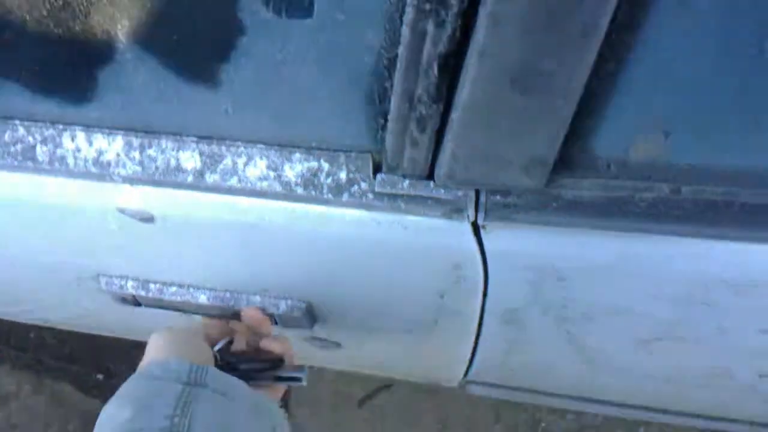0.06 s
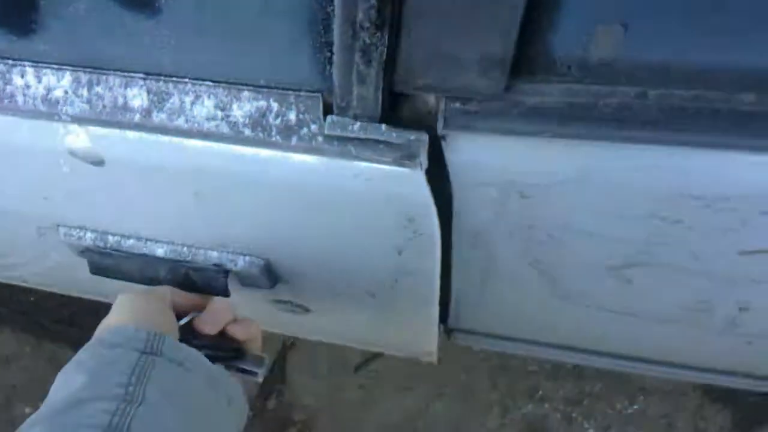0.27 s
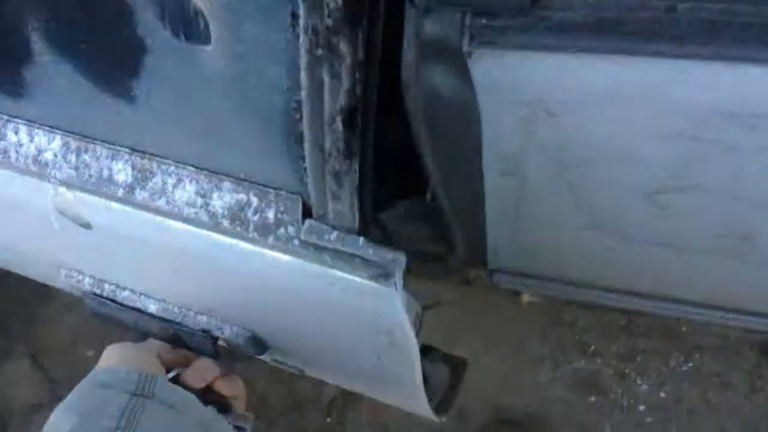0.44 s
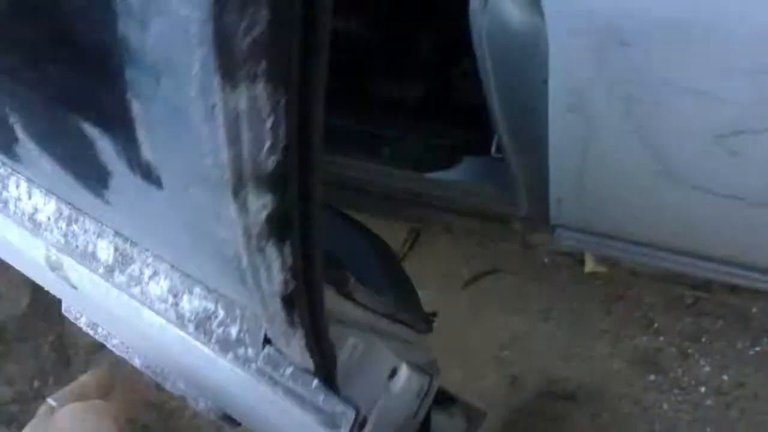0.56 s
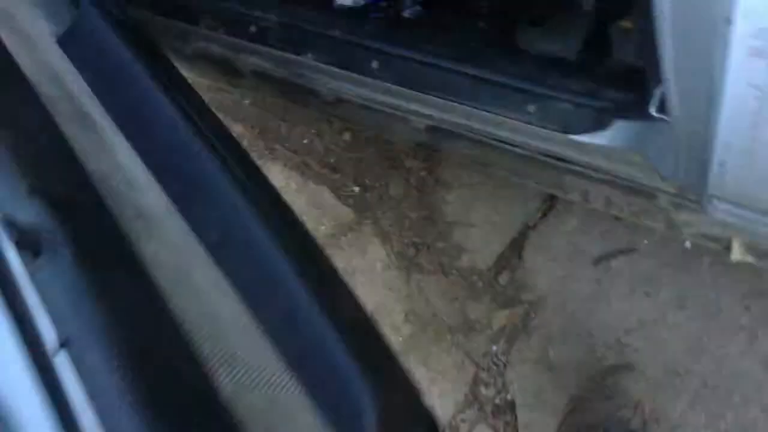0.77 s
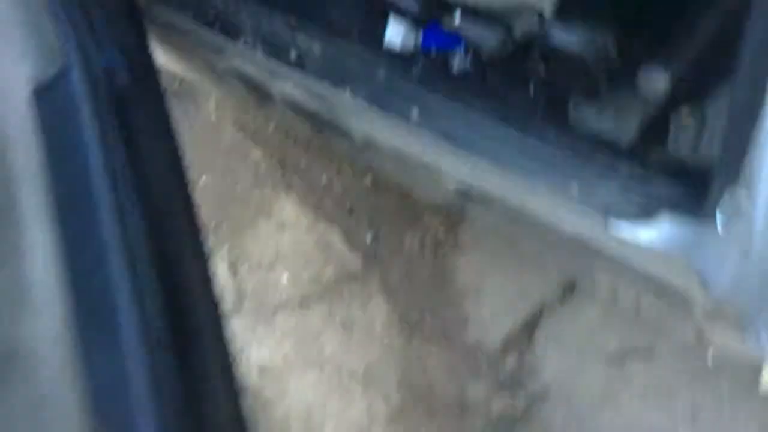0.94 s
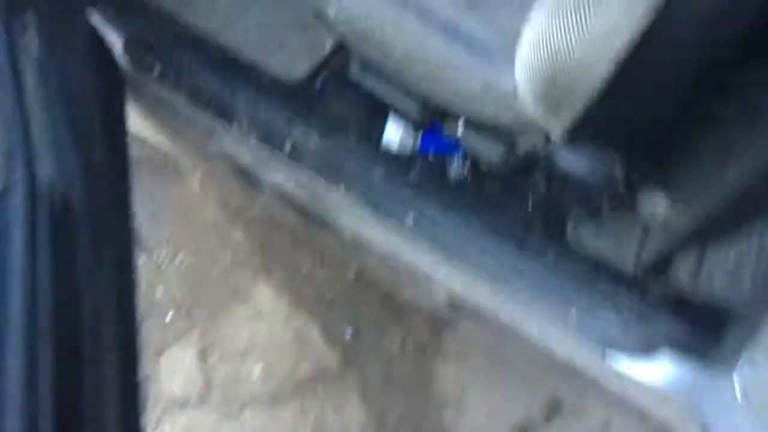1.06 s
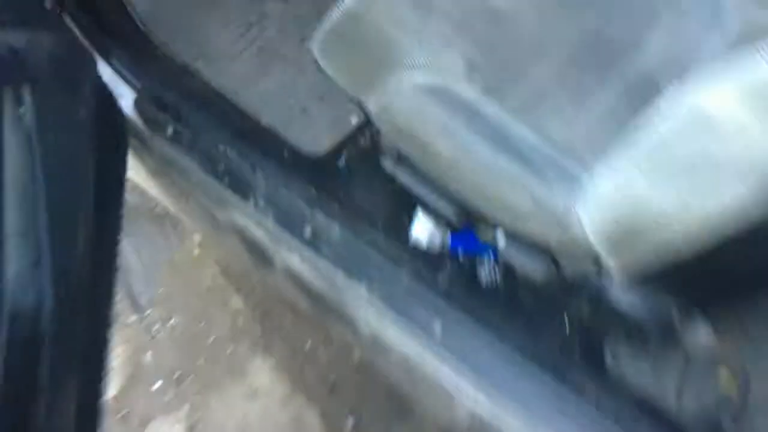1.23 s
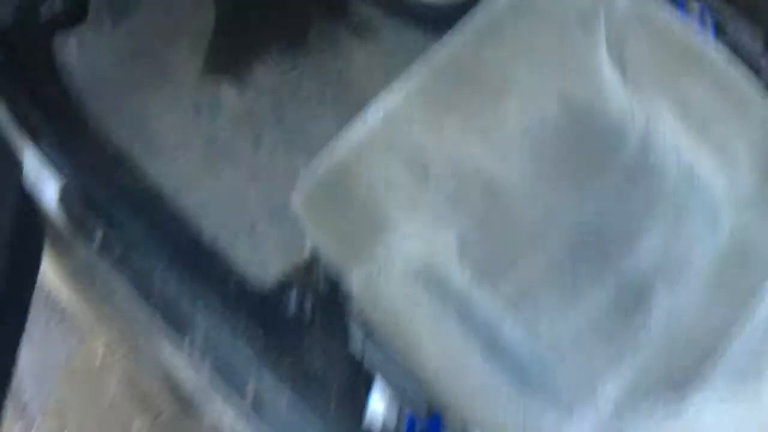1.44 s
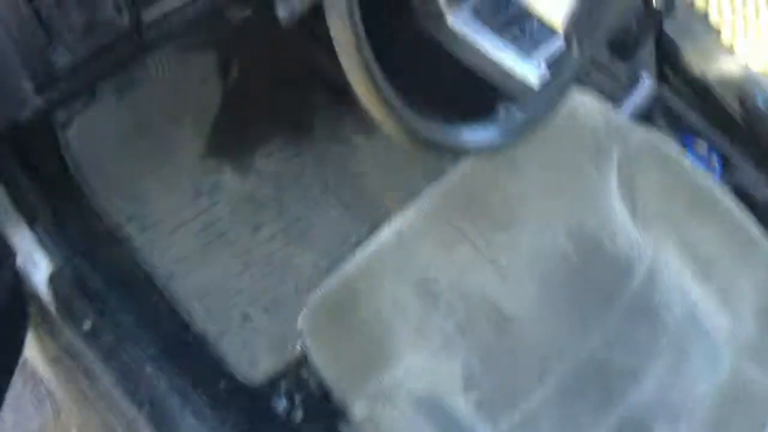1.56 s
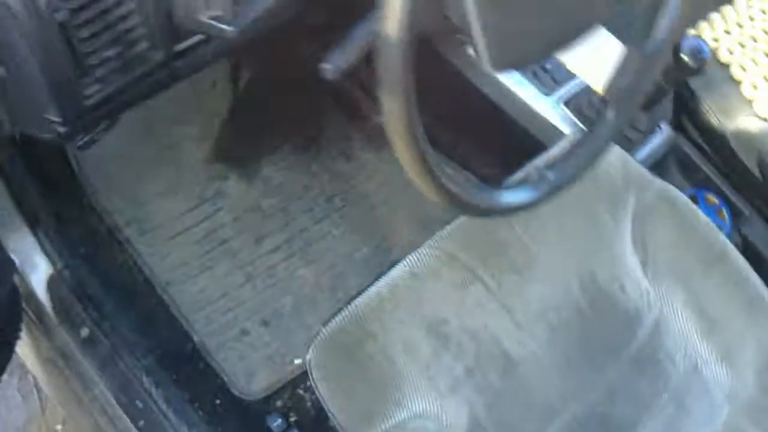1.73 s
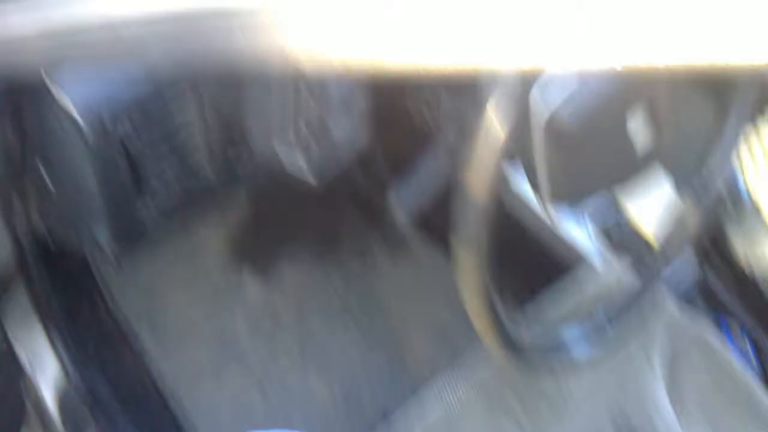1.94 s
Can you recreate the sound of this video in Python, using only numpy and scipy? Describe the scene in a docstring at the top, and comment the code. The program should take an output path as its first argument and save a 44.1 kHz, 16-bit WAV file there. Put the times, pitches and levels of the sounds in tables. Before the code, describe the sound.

A car door opens close to the microphone in a quiet yard: the handle clacks in the hollow door, the metal latch snaps and thumps, then only soft sleeve rustles, faint knocks and ticks remain.

```python
"""In a quiet yard, a car door is opened close by. The handle is pulled, its linkage clacks in the
hollow door and the lock lets go; then the latch snaps off the striker and the door panel rings.
Each blow sets off dying noise bands and dying sines; the catch adds short pings. A sleeve (grainy
noise) rustles, with faint knocks (short sines with noise) and ticks (noise clicks) around it."""
import sys
import numpy as np
from scipy import signal
from scipy.fft import irfft
from scipy.io import wavfile
from scipy.ndimage import uniform_filter1d

SR = 44100
rng = np.random.default_rng(int(sys.argv[2]) if len(sys.argv) > 2 else 0)


def wrap_up_sound(samples):
    """Save the sound to the file named by the first command line argument, as 16-bit audio."""
    columns = np.atleast_2d(samples).T
    # keep every value between -1 and 1, then stretch to whole-number steps
    tamed = np.clip(columns, -1, 1)
    steps = np.round(tamed * 32767).astype(np.int16)
    wavfile.write(sys.argv[1], SR, steps)


N = 88200  # length in samples: 2 s

# Pitches in Hz at which the three strengths of a blow are given
THUMP_HZ, CLACK_HZ, SNAP_HZ = 345, 1500, 8600
# Ringing builds up gradually, and low notes take longer: a time in s and a number of cycles
RISE_S, RISE_CYCLES = 0.00022, 0.63


def amp(db):
    """Turns decibels into a gain."""
    return 10 ** (np.asarray(db) / 20)


def fade(t, t60):
    """Energy leaks away steadily: the level falls by 60 dB in t60 seconds."""
    return np.exp(-np.log(1000) * t / t60)


def read(points, hz):
    """Reads between the points of a table, along a logarithmic frequency axis."""
    f, value = np.transpose(points)
    return np.interp(np.log(hz + 1), np.log(f + 1), value)


def add(mix, s, sound):
    """Mixes a sound in at time s, cutting off what runs past the end."""
    part = mix[max(round(s * SR), 0):][:len(sound)]
    part += sound[:len(part)]


def noise_spectrum(colour, size):
    """Spectrum with random phases, which gives noise of rms 1 in this colour."""
    hz = np.fft.rfftfreq(size, 1 / SR)
    gain = amp(read(colour, hz))
    to_rms_1 = np.sqrt(size / np.mean(gain ** 2))
    phases = np.exp(2j * np.pi * rng.random(len(hz)))
    return hz, gain * to_rms_1 * phases


def noise(colour, size):
    """Coloured noise of rms 1: many frequencies at once, with unrelated phases."""
    spectrum = noise_spectrum(colour, size)[1]
    return irfft(spectrum, size)


def dense_ring(colour, decay, force, size=24576, count=12):
    """Countless close modes: bands of noise that build up and die, each at its own speed."""
    t = np.arange(size) / SR
    hz, spectrum = noise_spectrum(colour, size)
    spectrum = spectrum * amp(read(force, hz))
    centres = np.geomspace(40, 15000, count)
    out = np.zeros(size)
    for centre, own in zip(centres, np.eye(count)):
        # Each band overlaps its neighbours, and together they add up to the whole spectrum
        share = read(np.c_[centres, own], hz)
        band = irfft(spectrum * share, size)
        rise = 1 - np.exp(-t / (RISE_S + RISE_CYCLES / centre / 2))
        out += band * rise * fade(t, read(decay, centre))
    return out


def mode_ring(modes, force, size=24576):
    """The few modes that stand out: sines that build up and die, with alternating signs."""
    t = np.arange(size) / SR
    out = np.zeros(size)
    for k, (hz, db, t60) in enumerate(modes):
        level = (-1) ** k * amp(db + read(force, hz))
        rise = 1 - np.exp(-t * hz / RISE_CYCLES)
        out += level * np.sin(2 * np.pi * hz * t) * rise * fade(t, t60)
    return out


def struck(blows, colour, decay, modes):
    """Each blow rings one part of the door; parts that stay in contact damp the ring."""
    out = np.zeros(N)
    for s, thump_db, clack_db, snap_db, ring in blows:
        force = [(THUMP_HZ, thump_db), (CLACK_HZ, clack_db), (SNAP_HZ, snap_db)]
        damped_decay = np.multiply(decay, [1, ring])
        damped_modes = np.multiply(modes, [1, 1, ring])
        add(out, s, dense_ring(colour, damped_decay, force) + mode_ring(damped_modes, force))
    return out


def quiet_air():
    """Still outdoor air and hiss: steady noise, strongest in the bass."""
    # Colour of the air (f/Hz, relative level per Hz/dB)
    air_colour = [(20, -4), (60, 5), (130, 1.5), (240, -2), (380, -3.5), (550, -4.5), (1030, -7),
                  (1700, -8), (2800, -14.5), (4000, -9.5), (7800, -7.5), (11500, -18.5), (15700, -16.5)]
    air_db = -61  # rms level
    return amp(air_db) * noise(air_colour, N)


def yard(x):
    """Weak, diffuse reverberation of the yard and cabin: the sound smeared by dying noise."""
    # Colour of the tail (f/Hz, relative level per Hz/dB)
    yard_colour = [(60, -10), (300, 4.5), (1200, -6.5), (3000, -7.5), (8000, 13.5), (16000, -24)]
    # Time in which the tail falls by 60 dB (f/Hz, t60/s)
    yard_decay = [(100, 0.37), (1000, 0.59), (8000, 0.12)]
    yard_db = -18.5  # energy of the tail compared with a single full-strength echo
    tail = dense_ring(yard_colour, yard_decay, [(CLACK_HZ, 0)])
    tail = tail / np.linalg.norm(tail)
    return amp(yard_db) * signal.fftconvolve(x, tail)[:N]


def sleeve():
    """Cloth slides in grainy swells as the arm moves: noise with an uneven loudness."""
    # Strokes of the sleeve (peak t/s, rise/s, fall/s, level before the grain/dB)
    strokes = [(.72, 0.077, 0.043, -58.5), (1.162, 0.014, 0.03, -52.5), (1.381, 0.087, 0.044, -58),
               (1.439, 0.031, 0.018, -54), (1.477, 0.02, 0.025, -48.5), (1.56, 0.028, 0.026, -60.5),
               (1.96, 0.19, 0.083, -62.5)]
    # Colour of the sliding cloth (f/Hz, relative level per Hz/dB)
    cloth_colour = [(60, -13), (200, -5.5), (750, -1), (1050, -1.5), (1450, -1), (2750, -9), (5200, -2),
                    (9000, -2), (11500, -12), (15500, -13)]
    grain_db, grain_s = 2.5, 0.004  # typical swing of the grain, and the time it is smoothed over
    t = np.arange(N) / SR
    power = np.zeros(N)
    for peak, rise, fall, db in strokes:
        width = np.where(t < peak, rise, fall)
        power += amp(db) ** 2 * np.exp(-((t - peak) / width) ** 2)
    grain = uniform_filter1d(rng.standard_normal(N), max(int(grain_s * SR), 1))
    unevenness = amp(grain_db * grain / grain.std())
    return np.sqrt(power) * unevenness * noise(cloth_colour, N)


def ticks(size=2048):
    """Tiny, dry clicks of trim that hardly ring: bursts of noise that die at once."""
    # Small dry ticks (t/s, starting level/dB)
    tick_list = [(0.3882, -44.5), (.411, -53), (1.8185, -50.5), (1.95, -40.5)]
    # Colour of a tick (f/Hz, relative level per Hz/dB)
    tick_colour = [(100, 0), (1200, -23), (2000, 12), (2700, -26.5), (3400, 2), (5500, -18), (8000, 3),
                   (11000, -51), (16000, -10)]
    tick_t60 = 0.014  # s
    out, t = np.zeros(N), np.arange(size) / SR
    for s, db in tick_list:
        add(out, s, amp(db) * noise(tick_colour, size) * fade(t, tick_t60))
    return out


def knocks():
    """Dull, slightly scuffing bumps: a short swell of a sine mixed with noise around its pitch."""
    # Soft knocks from the swinging door and the hand (t/s, level/dB, f/Hz, length/s)
    knock_list = [(0.067, -54.5, 46, 0.066), (0.187, -41.5, 53, 0.08), (.461, -58.5, 213, 0.015),
                  (0.515, -47, 66, 0.021), (0.795, -51.5, 554, 0.0047), (1.01, -52.5, 586, 0.0087),
                  (1.022, -56.5, 453, 0.0087), (1.078, -52, 590, 0.0049), (1.195, -51.5, 1420, 0.0036),
                  (1.239, -55, 724, .01), (1.255, -50, 363, 0.0094), (1.359, -45.5, 318, 0.013),
                  (1.388, -58, 40.5, 0.09), (1.504, -56, 253, 0.024), (1.79, -54.5, 693, 0.0045),
                  (1.907, -52, 1090, 0.0039)]
    roughness = 0.45  # rms of the scuff, compared with a sine of peak 1
    out = np.zeros(N)
    for s, db, hz, length in knock_list:
        t = np.arange(0, length, 1 / SR)
        scuff_colour = [(hz / 4, -12), (hz, 0), (2 * hz, -8), (8 * hz, -45)]
        scuff = noise(scuff_colour, 8192)[:len(t)]
        # The power below 1 brings the peak forward
        swell = np.sin(np.pi * (t / length) ** 0.54) ** 2
        add(out, s, amp(db) * swell * (np.sin(2 * np.pi * hz * t) + roughness * scuff))
    return out


def hum():
    """The wide sheet of the door hums on after heavy blows: low sines that die slowly."""
    # Hums of the sheet (t/s, level before rise and decay/dB, f/Hz, t60/s)
    hum_list = [(.285, -48, 166, 0.54), (0.605, -48, 221, 0.67)]
    out, t = np.zeros(N), np.arange(SR) / SR
    for s, db, hz, t60 in hum_list:
        rise = 1 - np.exp(-t * hz / 2)
        add(out, s, amp(db) * np.sin(2 * np.pi * hz * t) * rise * fade(t, t60))
    return out


def catch():
    """Steel catch snapping home: steel on steel gives a hard, very short ping."""
    # Snaps of the catch (t/s, strength/dB)
    snaps = [(.2724, -22), (.5663, -17.5)]
    # Short modes of the catch (f/Hz, level added to the strength/dB, t60/s)
    catch_modes = [(1220, -22.5, .016), (2090, -9, 0.016), (4490, 0.5, 0.0083), (5100, -11, 0.0036),
                   (6100, -4, 0.0077), (8260, -6.5, 0.0087), (13500, -18, 0.0078)]
    out = np.zeros(N)
    for s, db in snaps:
        # A single point of force drives all modes equally
        add(out, s, mode_ring(catch_modes, [(SNAP_HZ, db)], size=4000))
    return out


def handle():
    """The handle and its linkage strike inside the hollow door, and the skin behind them rings."""
    # Blows (t/s, thump/dB, clack/dB, snap/dB, ring time as a share of the free decay)
    blows = [(.147, -42, -56, -70, .8), (.161, -41, -46, -44, 0.72), (.167, -43, -46.5, -46, 0.84),
             (.179, -42.5, -47.5, -58, 1), (.2047, -30, -25, -26, 0.22), (.207, -31, -30, -22, 0.18),
             (.2125, -24, -24, -25.5, 0.88), (.2385, -38, -49, -48, 0.75), (.2528, -31.5, -39, -36, 0.9),
             (.2715, -27.5, -37.5, -16.5, 0.95), (.2845, -33.5, -58, -47, 0.44), (.312, -36, -45, -44, .25),
             (.327, -42.5, -47, -54, 0.44), (.354, -39, -45.5, -72, 0.2)]
    # Dense ringing (f/Hz, relative level per Hz/dB) and its free decay (f/Hz, t60/s)
    colour = [(25, -2), (55, -4), (95, -13), (200, -2.5), (480, -4), (900, -3), (1700, -0.5), (2900, -5.5),
              (4200, -5), (8000, -12.5), (10500, -18), (12500, -28.5), (15500, -25)]
    decay = [(50, 0.18), (200, 0.27), (600, 0.22), (1500, .11), (5000, 0.083), (14000, 0.051)]
    # Modes of the door skin behind the handle (f/Hz, level added to the blow/dB, free t60/s)
    skin_modes = [(211, -7, 0.18), (357, -11.5, 0.1), (599, -26, 0.18), (752, -14.5, 0.17),
                  (878, -14, 0.15), (990, -24, 0.14), (1119, -8, 0.12), (1290, -8.5, 0.11),
                  (1558, -12.5, 0.16), (1798, -18, 0.23), (1940, -36, .09), (3827, -17.5, 0.14)]
    return struck(blows, colour, decay, skin_modes)


def latch():
    """The latch and loose parts of the door strike, and the frame around the latch rings."""
    # Blows (t/s, thump/dB, clack/dB, snap/dB, ring time as a share of the free decay)
    blows = [(.498, -41.5, -51, -87, 1), (.5328, -37.5, -38, -36.5, 1), (.538, -25, -34.5, -37.5, 0.63),
             (.5595, -45, -40, -38, 0.9), (.5638, -51, -31, -36, 0.25), (.566, -29.5, -22, -28.5, 1),
             (.5745, -24, -28, -45.5, 0.96), (.604, -25, -57, -52, 0.33), (.659, -33, -43, -69, 0.72),
             (.667, -33, -43, -68, 0.28), (.727, -36, -49, -68, 0.26)]
    # Dense ringing (f/Hz, relative level per Hz/dB) and its free decay (f/Hz, t60/s)
    colour = [(40, -43), (100, -7), (190, -2), (500, 3.5), (850, -2), (1450, 3.5), (2100, -3.5),
              (2800, -5.5), (4400, 7.5), (8000, 2), (10000, -11.5), (15500, -7)]
    decay = [(50, 0.43), (200, 0.25), (600, 0.21), (1500, 0.13), (5000, 0.06), (14000, 0.04)]
    # Modes of the door frame around the latch (f/Hz, level added to the blow/dB, free t60/s)
    frame_modes = [(197.6, -24.5, 0.39), (270, -18.5, 0.19), (414, -18, 0.2), (535, -23.5, 0.36),
                   (1150, -26, 0.18), (1290, -22, .15), (1353, -35, 0.11), (1647, -16, 0.11),
                   (1982, -23.5, 0.16)]
    return struck(blows, colour, decay, frame_modes)


def scene():
    """Handle, catch and latch with their reverberation, over the small noises and quiet air."""
    quiet = quiet_air() + sleeve() + ticks() + knocks()
    door = handle() + catch() + latch()
    return (door + yard(door) + hum() + quiet)[None]


def record(dry):
    """Band limit: a steep filter takes away the highest treble."""
    edge_hz = 16300
    lowpass = signal.firwin(401, edge_hz, window=("kaiser", 9), fs=SR)
    return signal.oaconvolve(dry, lowpass[None], "same")


dry = scene()
out = record(dry)
wrap_up_sound(out)
```